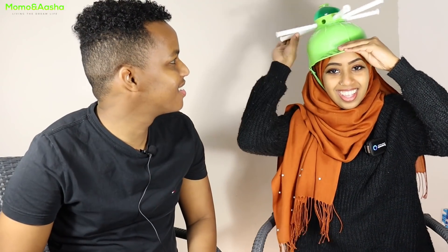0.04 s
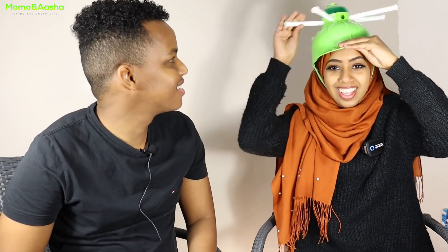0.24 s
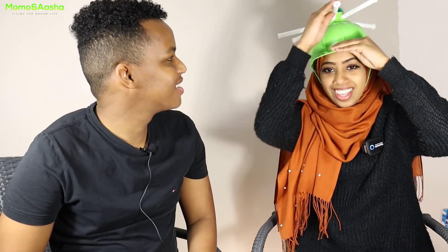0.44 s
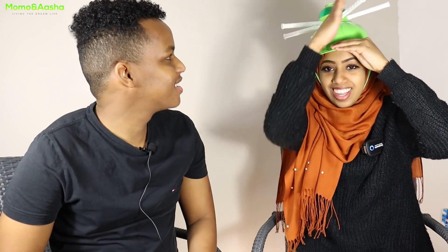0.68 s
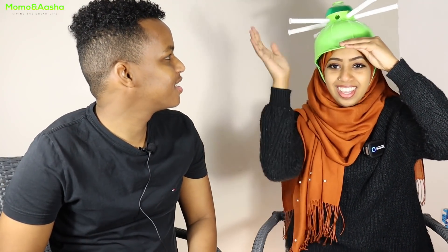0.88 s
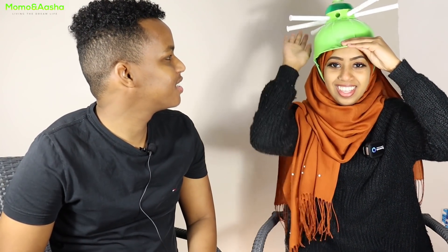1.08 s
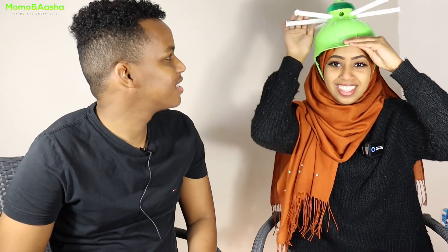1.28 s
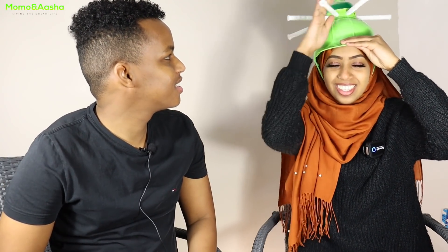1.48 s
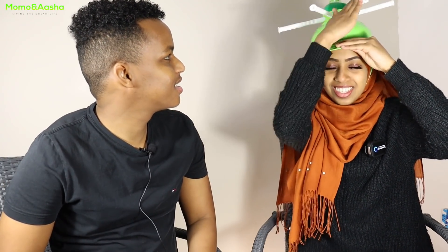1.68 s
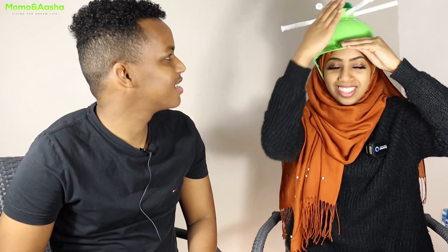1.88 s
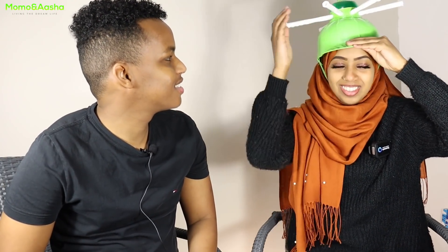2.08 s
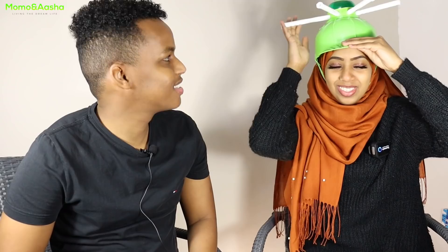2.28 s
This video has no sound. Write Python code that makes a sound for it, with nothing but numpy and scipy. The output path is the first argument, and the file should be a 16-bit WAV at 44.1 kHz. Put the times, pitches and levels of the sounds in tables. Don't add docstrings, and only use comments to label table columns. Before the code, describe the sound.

A plastic ratchet on a hollow toy helmet is twisted twice by hand, giving two rapid bursts of sharp clicks with dull knocks and faint loose ticks between, close to the microphone in a lively bare room.

```python
import sys
import numpy as np
from scipy import signal
from scipy.fft import rfft, irfft
from scipy.io import wavfile
from scipy.ndimage import uniform_filter1d

SR = 44100
rng = np.random.default_rng(int(sys.argv[2]) if len(sys.argv) > 2 else 0)


def nominal_scale(level):
    x = np.asarray(level, float) / 20
    return 10 ** x


def file_out(sig):
    cols = np.atleast_2d(sig).T
    lim = np.clip(cols, -1, 1)
    pcm = np.round(lim * 32767).astype(np.int16)
    wavfile.write(sys.argv[1], SR, pcm)


N = 103017

# (time [s], peak level [dB], loudest ring [Hz], treble level [dB], upper shell level [dB])
FIRST_TWIST = [(0.184, -8.5, 2265, -12, -13), (0.2346, -13.5, 3600, -9, -12),
               (0.2821, -15, 3400, -16.5, -12), (0.3272, -14.5, 2470, -12, -11.5),
               (0.3622, -13.5, 3220, -11.5, -28), (0.3933, -10, 2060, -26, -22),
               (0.4214, -14.5, 2030, -8, -25), (0.4449, -14.5, 2050, -9.5, -16.5),
               (0.4731, -14.5, 4200, -4, -16), (0.494, -14, 2940, -9.5, -13), (0.518, -15, 1720, -7.5, -8),
               (0.5455, -12.5, 3920, -5, -16), (0.5774, -11, 3590, -8, -13), (0.6144, -5, 2520, -14.5, -34),
               (0.6584, -3.5, 2150, -13.5, -23), (0.7127, -3, 3370, -14, -7)]
SECOND_TWIST = [(1.4382, -6.5, 2420, -9.5, -32), (1.503, -4.5, 3440, -9.5, -32),
                (1.5333, -7, 1760, -6.5, -33), (1.5583, -4, 2640, -10.5, -18),
                (1.5784, -7.5, 3350, -12.5, -22), (1.5819, -7.5, 2780, -14.5, -23),
                (1.5963, -10.5, 2980, -18, -20), (1.616, -6, 3000, -11.5, -28),
                (1.6405, -3.5, 2530, -13.5, -17), (1.6737, -5.5, 2440, -11, -12.5),
                (1.7131, -3.5, 2540, -12.5, -14), (1.7531, -4.5, 2450, -8.5, -7),
                (1.7964, -7.5, 2260, -5, -5.5), (1.8477, -6.5, 2320, -8, -3)]
# (time [s], peak level [dB], ring [Hz])
ROD_TICKS = [
    (0.089, -39.5, 3300),
    (0.105, -34, 3200),
    (0.122, -34.5, 3000),
    (0.135, -39, 3150),
    (0.151, -35, 2350),
    (1.326, -44.5, 2280),
    (1.381, -41, 3300),
    (1.976, -31.5, 2060),
    (2.013, -32.5, 2800),
    (2.092, -45, 3140),
]
# (frequency [Hz], level [dB], decay t60 [s])
SHELL_MODES = [(1300, -16.5, 0.018), (1600, -2, 0.0065), (2050, -35.5, 0.022), (2420, 4, 0.03),
               (3000, 7.5, 0.0058), (3535, 5, 0.0092)]
# (frequency [Hz], level [dB], decay t60 [s])
UPPER_MODES = [(4350, 4, 0.011), (5000, -0.5, 0.0127), (5410, -13.5, .008)]
# (frequency [Hz], level [dB], decay t60 [s])
PAWL_MODES = [(4900, -4.5, 0.006), (6380, -6, 0.006), (8410, 1, 0.0024), (9450, 3, 0.0016),
              (11700, 1.5, 0.0019), (13600, -17.5, 0.00078)]
# (frequency [Hz], level [dB], decay t60 [s])
LINGERING_MODES = [(1850, -26.5, 0.024), (2067, -24, 0.019), (2390, -26.5, 0.02)]
# (delay [s], level [dB])
REFLECTIONS = [(.0045, -9.5), (.0095, -14), (.014, -35.5), (0.021, -19.5)]
# (time [s], peak level [dB], pitch [Hz])
HELMET_KNOCKS = [(0.188, -15.5, 240), (0.297, -18.5, 410), (0.336, -18.5, 153), (0.336, -29, 198),
                 (0.374, -21, 198), (0.401, -11, 263), (0.425, -30, 345), (0.451, -20.5, 277),
                 (0.471, -7, 300), (0.496, -11, 290), (0.546, -11.5, 342), (1.324, -29, 627),
                 (1.435, -39, 475), (1.578, -1, 244), (1.584, -3, 537), (1.592, -6.5, 307),
                 (1.61, -9.5, 490), (1.974, -23.5, 552)]
# (time [s], level [dB])
FIRST_RUB = [
    (0.15, -52.5),
    (0.232, -38),
    (0.37, -33.5),
    (0.456, -33.5),
    (0.55, -39),
    (0.716, -62),
    (0.8, -57.5),
]
SECOND_RUB = [
    (1.3, -61.5),
    (1.382, -55.5),
    (1.506, -42),
    (1.632, -24.5),
    (1.678, -47.5),
    (1.74, -41),
    (1.888, -50),
    (2.1, -58),
]
# (frequency [Hz], level [dB])
RUB_TONE = [(30, -26.5), (60, -16), (130, -11), (290, -4), (550, -5), (900, -15.5), (1500, -11.5),
            (3000, -59.5)]
# (frequency [Hz], level [dB], decay t60 [s])
HOLLOW_MODES = [(69, -4, 0.11), (190.8, -0.5, 0.39), (277.3, -2.5, 0.22), (345, -5, 0.16),
                (453.7, -2, 0.084), (491, -4.5, 0.24), (677, 6, 0.068), (858, 8, .05)]
# (frequency [Hz], decay t60 [s])
WALL_DECAY = [(200, 0.25), (1500, .48), (2380, 0.45), (3000, 0.31), (5000, 0.51), (9000, 0.41),
              (14000, 0.26)]
# (frequency [Hz], level [dB])
SNAP_WALL_TONE = [(400, -15), (1400, -9), (1900, -7), (3300, -1.5), (5100, -6), (6600, -10), (8300, -9),
                  (15000, -15)]
# (frequency [Hz], level [dB])
HELMET_WALL_TONE = [(100, 0.002), (1000, 0.0034)]
# (frequency [Hz], level [dB])
HISS_TONE = [(22, -12.5), (50, 6.5), (110, -5), (330, -24.5), (900, -15), (1700, -14.5), (3400, -19),
             (16000, -23.5)]

RING_DB, RING_T60_S = 6, 0.013
DETUNE, SCATTER_DB = 0.03, 2
SLIP_RISE_S, SLIP_FALL_S = 0.0014, 0.0016
SLIPS_PER_S, MAIN_SLIP = 3000, 2.4
THIN_HZ, THUD_HZ, THUD_DB = 1600, 547, -15
PAWL_HZ, PAWL_S = 5150, 0.0015
BODY_DB, TREBLE_DB, UPPER_DB = -0.86, 5.5, 4.5
TICK_DB, TICK_TREBLE_DB, TICK_UPPER_DB, TICK_T60_S = 5, -16, -29, 0.011
KNOCK_DB, KNOCK_T60_S = -5.5, 0.016
RUB_DB, HOLLOW_DB = -9, -0.5
TREBLE_SENT = 0.96
WALLS_DB, LOW_WALLS_DB, ONSET_S = -12.5, 0.5, 0.0027
HISS_DB = -60.5


def ratchet():
    events = []
    for s, db, hz, treble_db, upper_db in FIRST_TWIST + SECOND_TWIST:
        events.append((s, db + BODY_DB, hz, treble_db + TREBLE_DB, upper_db + UPPER_DB, RING_T60_S, THIN_HZ))
    for s, db, hz in ROD_TICKS:
        events.append((s, db + TICK_DB, hz, TICK_TREBLE_DB, TICK_UPPER_DB, TICK_T60_S, 700))
    near = np.zeros(N)
    body_blows, treble_blows = np.zeros((2, N))
    for s, db, hz, treble_db, upper_db, t60, thin_hz in events:
        for late, loss_db in [(0.0002, 0.0068)] + REFLECTIONS:
            add(near, s + late, snap(db + loss_db, hz, treble_db, upper_db, t60, thin_hz))
        i = round(s * SR)
        body_blows[i] = nominal_scale(db)
        treble_blows[i] = nominal_scale(db + TREBLE_SENT * (treble_db + 8))
    bright = signal.butter(2, PAWL_HZ, "high", fs=SR, output="sos")
    extra_treble = signal.sosfiltfilt(bright, treble_blows - body_blows)
    lingering = signal.oaconvolve(body_blows, ring(LINGERING_MODES, np.zeros(20)))[:N]
    return near, body_blows + extra_treble - lingering


def snap(peak_db, hz, treble_db, upper_db, t60, thin_hz):
    t = np.arange(400) / SR
    luck, slips, crack = rng.standard_normal((3, 400))
    slips = slips * (0.25 + (rng.random(400) < SLIPS_PER_S / SR))
    slips[round(SLIP_RISE_S * SR)] = MAIN_SLIP
    rise = (t / SLIP_RISE_S) ** 2
    fall = np.exp((SLIP_RISE_S - t) / SLIP_FALL_S)
    slips = slips * np.where(t < SLIP_RISE_S, rise, fall)

    shell = signal.fftconvolve(slips, ring(SHELL_MODES + [(hz, RING_DB, t60)], luck))
    thud = nominal_scale(THUD_DB) * high(shell, THUD_HZ)
    body = high(high(shell, thin_hz), thin_hz) + thud
    upper = high(signal.fftconvolve(slips, ring(UPPER_MODES, luck[50:])), 3600)
    crack = crack * t / PAWL_S * np.exp(-(t / PAWL_S) ** 1.32)
    treble = high(signal.fftconvolve(crack, ring(PAWL_MODES, luck[100:])), PAWL_HZ)

    parts = np.array([body, upper, treble])
    levels = nominal_scale([peak_db, peak_db + upper_db, peak_db + treble_db])
    return levels / abs(parts).max(1) @ parts


def ring(modes, luck, size=2048):
    hz, db, t60 = np.transpose(modes)[:, :, None]
    t = np.arange(size) / SR
    level_luck, pitch_luck = luck[:2 * len(modes)].reshape(2, -1, 1)
    decay = nominal_scale(db + SCATTER_DB * level_luck - 60 * t / t60)
    wave = decay * np.sin(2 * np.pi * hz * (1 + DETUNE * pitch_luck) * t)
    return wave.sum(0)


def helmet():
    return high(knocks(), 90) + rubbing()


def knocks():
    out, t = np.zeros(N), np.arange(3000) / SR
    for s, db, hz in HELMET_KNOCKS:
        contact = 1.7 * high(rng.standard_normal(3000), 600) * np.exp(-t / 0.004)
        wave = uniform_filter1d(np.sin(2 * np.pi * hz * t) + contact, size=16)
        decay = nominal_scale(db + KNOCK_DB - 60 * t / KNOCK_T60_S)
        add(out, s, decay * np.minimum(t / 0.0024, 1) * wave)
    return out


def rubbing():
    s, db = np.transpose(FIRST_RUB + SECOND_RUB)
    pressure = nominal_scale(RUB_DB + np.interp(np.arange(N) / SR, s, db))
    lumps = nominal_scale(3.7 * evened(uniform_filter1d(rng.standard_normal(N), size=300)))
    slips = lumps * rng.standard_normal(N)
    hum = evened(signal.fftconvolve(slips, ring(HOLLOW_MODES, np.zeros(20), size=6000))[:N])
    rub = evened(lumps * coloured(RUB_TONE))
    return pressure * (rub + nominal_scale(HOLLOW_DB) * hum)


def room(x, tone):
    out, turn = np.zeros(N), 2 * np.pi * 7.3 * np.arange(N) / SR
    taps = np.zeros((3, SR))
    at = np.arange(0, SR - 12, 12) + rng.integers(0, 12, (3, (SR - 1) // 12))
    np.put_along_axis(taps, at, rng.choice([-1., 1.], at.shape), 1)
    hz, t, z = signal.stft(taps, SR, nperseg=256)
    z = z * nominal_scale(read(tone, hz)[:, None] - 60 * t / read(WALL_DECAY, hz)[:, None])
    onset = np.minimum(np.arange(SR) / SR / ONSET_S, 1)
    tails = signal.istft(z, SR, nperseg=256)[1][:, :SR] * onset
    for k, tail in enumerate(tails):
        share = np.sqrt(2 / 3) * np.cos(turn + 2 * np.pi * k / 3)
        out += signal.fftconvolve(x * share, tail / np.linalg.norm(tail))[:N]
    return out


def hiss():
    return nominal_scale(HISS_DB) * coloured(HISS_TONE)


def coloured(points):
    spectrum = rfft(rng.standard_normal(N)) * nominal_scale(read(points, np.fft.rfftfreq(N, 1 / SR)))
    return evened(irfft(spectrum, N))


def evened(x):
    return x / np.sqrt(np.mean(x ** 2) + 1e-20)


def read(points, hz):
    f, value = np.transpose(points)
    return np.interp(np.log(hz + 1), np.log(f + 1), value)


def high(x, hz):
    return signal.sosfilt(signal.butter(4, hz, "high", fs=SR, output="sos"), x)


def add(mix, s, sound):
    part = mix[round(s * SR):][:len(sound)]
    part += sound[:len(part)]


def scene():
    clicks, blows = ratchet()
    shell = helmet()
    snap_walls = nominal_scale(WALLS_DB + 19.5) * room(blows, SNAP_WALL_TONE)
    helmet_walls = nominal_scale(LOW_WALLS_DB) * room(shell, HELMET_WALL_TONE)
    return (clicks + shell + snap_walls + helmet_walls + hiss())[None]


def low_pass(x):
    return signal.sosfilt(signal.butter(12, 16490, fs=SR, output="sos"), x)


def record(dry):
    edge = signal.firwin(301, 15600, window=("kaiser", 8), fs=SR)
    limited = signal.oaconvolve(dry, edge[None], "same")
    return low_pass(np.clip(limited, -1, 1))


dry = scene()
out = record(dry)
file_out(out)
```